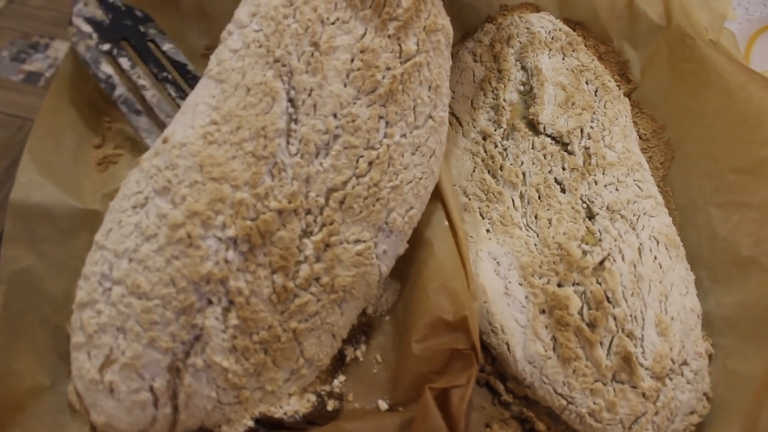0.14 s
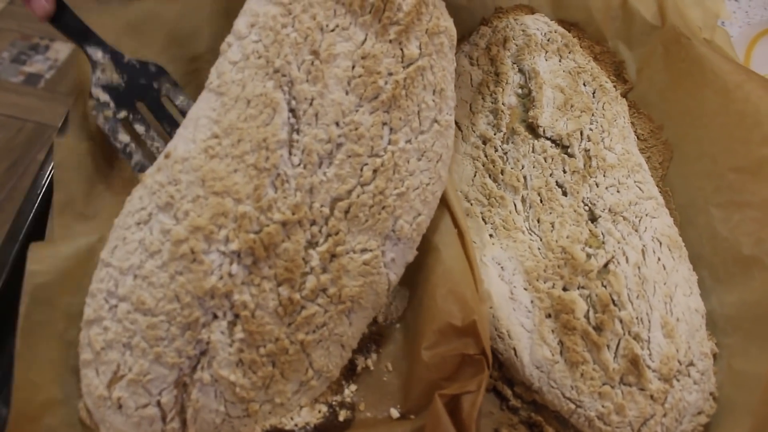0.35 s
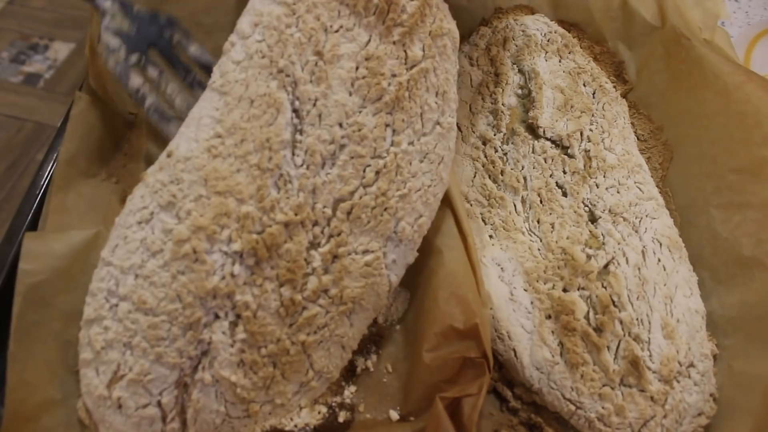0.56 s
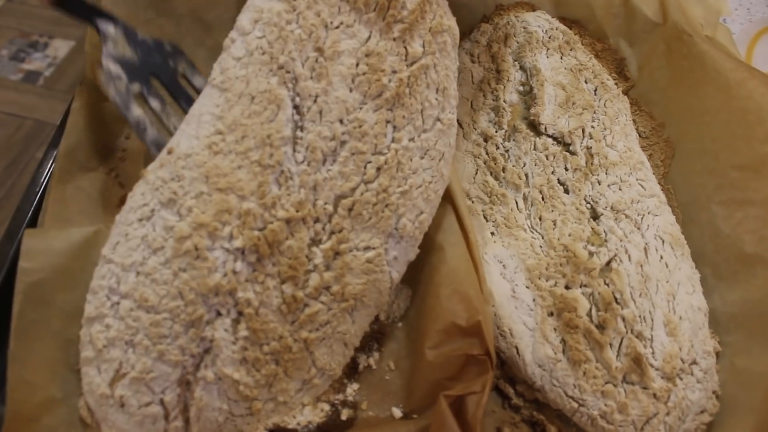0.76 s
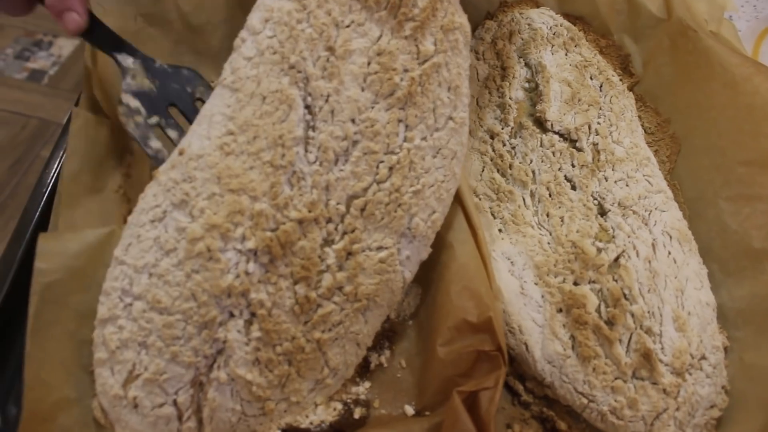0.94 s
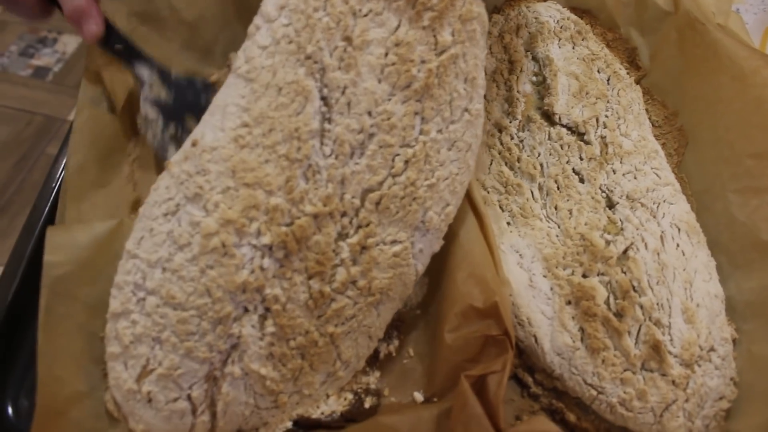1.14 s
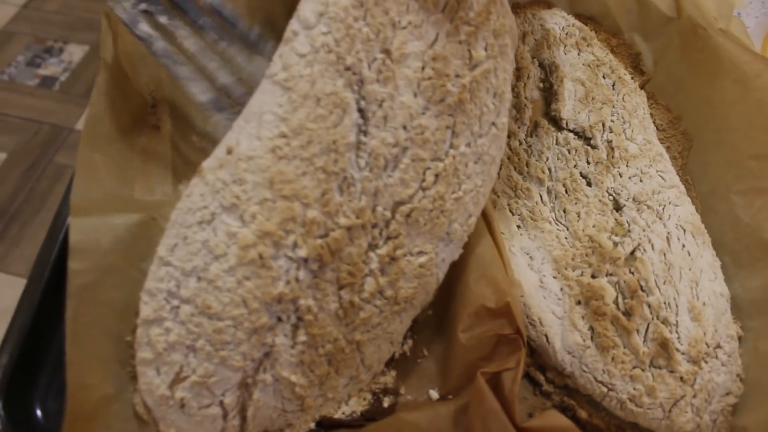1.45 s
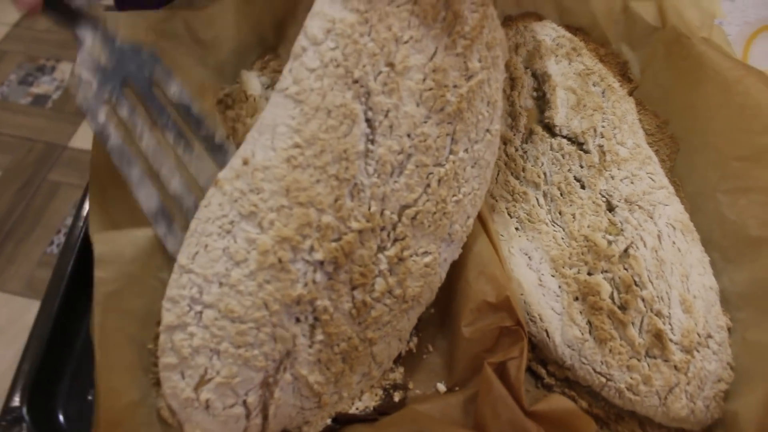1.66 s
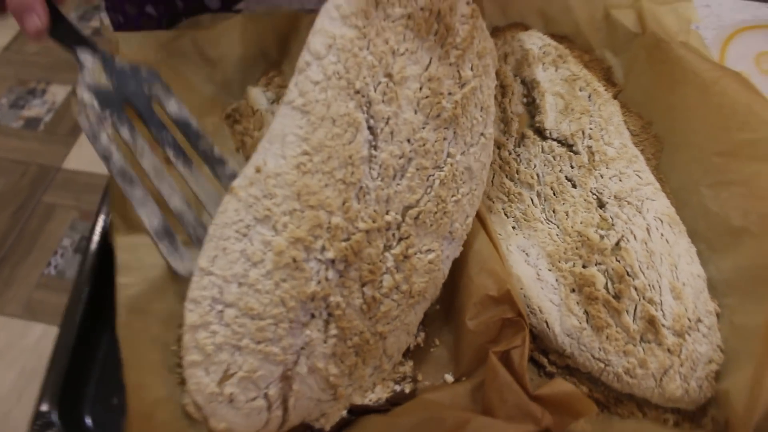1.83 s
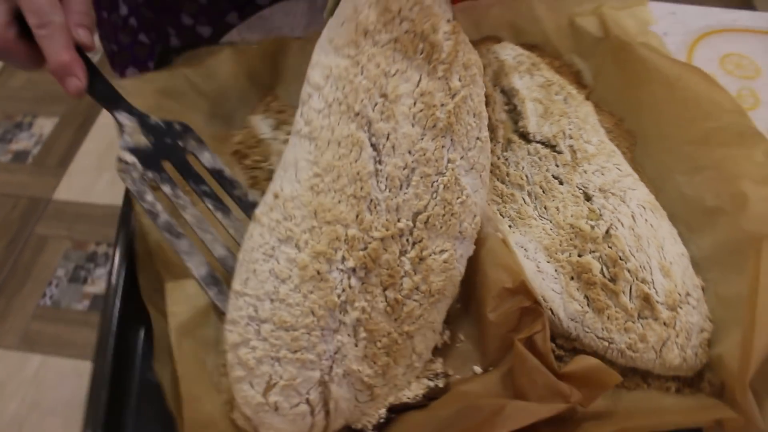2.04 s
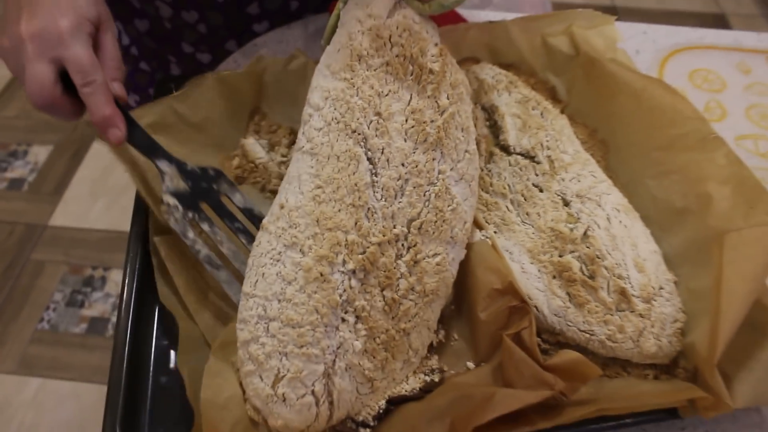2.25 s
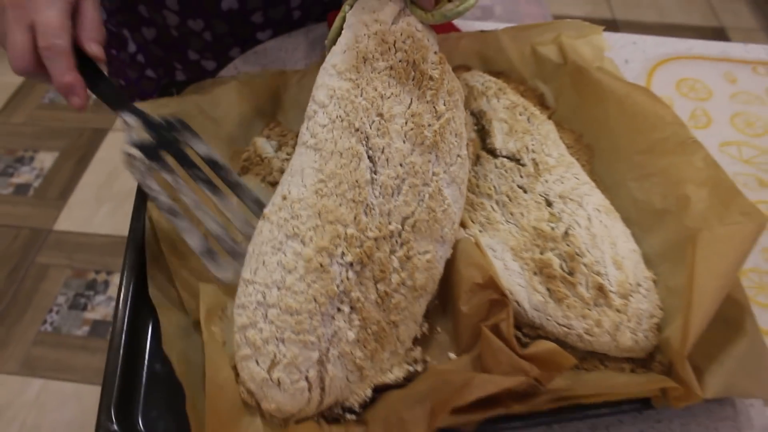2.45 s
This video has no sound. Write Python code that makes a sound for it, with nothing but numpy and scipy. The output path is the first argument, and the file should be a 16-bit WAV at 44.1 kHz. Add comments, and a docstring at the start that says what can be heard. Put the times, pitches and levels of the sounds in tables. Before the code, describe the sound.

Stiff baking parchment crinkles and snaps close to a phone microphone in a small kitchen, pausing briefly between bursts, while a spatula nudges a loaf and the tray thuds softly underneath.

```python
"""A small kitchen, heard close to a phone: a spatula works under a loaf on a tray and dry parchment crinkles.
Single creases snap with short noise bursts, stiff folds ring at a pitch, patches crunch and tiny creases
rustle as shaped noise. Loaf and tray thud softly and rub dully; the room adds a noisy tail.
Quiet room noise and a low rumble lie behind."""
import sys
import numpy as np
from scipy import signal
from scipy.fft import rfft, irfft
from scipy.io import wavfile
from scipy.ndimage import uniform_filter1d

SR = 44100
rng = np.random.default_rng(int(sys.argv[2]) if len(sys.argv) > 2 else 0)


def unload_audio(sound):
    """Save the sound as a 16-bit wav file, at the path given as the first command line argument."""
    columns = np.transpose(np.atleast_2d(sound))
    # keep every value between -1 and 1, then stretch to whole-number steps
    steps = np.round(np.clip(columns, -1, 1) * 32767)
    wavfile.write(sys.argv[1], SR, steps.astype(np.int16))


N = 114660  # length [samples]

# low, middle and high band of the sheet's sound:
# (from [Hz], to [Hz], multiplier of the fade time [-], rustle trim [dB])
BANDS = [(728, 2220, 1.27, -3.5), (2046, 5720, 0.83, -4), (5990, 14770, 0.92, -0.5)]
# faint rustle of the sheet before the band trim: (time [s], middle level [dB], high level [dB])
RUSTLE = [(0, -29.5, -39), (0.061, -41.5, -50.5), (0.1, -43, -63), (0.16, -39, -48.5), (0.28, -33.5, -52),
          (0.47, -28.5, -36.5), (0.66, -40, -53), (0.83, -48.5, -58), (0.97, -33, -42),
          (1.12, -29.5, -43.5), (1.25, -27.5, -33.5), (1.33, -30.5, -39), (1.39, -35.5, -45.5),
          (1.47, -40.5, -49.5), (1.6, -55, -60), (1.645, -42, -54), (1.71, -27, -34.5), (1.8, -26.5, -35),
          (1.92, -24.5, -31.5), (2.13, -27, -31), (2.22, -30.5, -38.5), (2.35, -32.5, -36),
          (2.47, -40, -50), (2.6, -38, -43.5)]
# stiff folds that flip, levels before the trims:
# (time [s], pitch [Hz], ring level [dB], middle band level [dB], high band level [dB])
TAPS = [(0.1094, 2700, -25, -17, -24), (0.1381, 1440, -20, -9.5, -10.5), (0.679, 2320, -28, -34, -38),
        (0.7035, 1780, -27, -30, -47), (1.6162, 1215, -18, -15.5, -30), (1.655, 1440, -17.5, -20, -27),
        (1.6836, 1860, -13.5, -10, -14), (2.4133, 1320, -15.5, -9.5, -7), (2.483, 1610, -13, -14, -8),
        (2.5453, 2490, -22.5, -23, -41), (2.578, 2440, -22.5, -20.5, -10)]


def undb(db):
    """Turn decibels into gain."""
    return 10 ** (np.asarray(db) / 20)


def unit(x):
    """Scale a sound to an rms level of 1."""
    return x / np.sqrt(np.mean(x ** 2))


def decay(t, t60):
    """Fall smoothly by 60 dB in t60 seconds."""
    return np.exp(-np.log(1000) * t / t60)


def curve(table, column):
    """Draw straight lines between the values in one column of a table that starts with time."""
    rows = np.array(table)
    return np.interp(np.arange(N) / SR, rows[:, 0], rows[:, column])


def colour(x, table):
    """Make pitches stronger or weaker by a table of (frequency [Hz], level [dB])."""
    hz, db = np.array(table, float).T
    f = np.maximum(np.arange(N // 2 + 1) * SR / N, 1)
    gain = undb(np.interp(np.log(f), np.log(hz), db))
    return irfft(rfft(x) * gain, N)


def band(x, lo_hz, hi_hz, order=3):
    """Keep only the sound between two frequencies."""
    return signal.sosfilt(signal.butter(order, [lo_hz, hi_hz], "band", fs=SR, output="sos"), x)


def fade(x, t60):
    """Let every impulse die away by 60 dB in t60 seconds."""
    return signal.lfilter([1], [1, -np.exp(-np.log(1000) / (t60 * SR))], x)


def impulses(times, sizes):
    """Place impulses of given sizes at given times in seconds."""
    return np.bincount(np.clip((times * SR).astype(int), 0, N - 1), sizes, N)


def walk(per_s):
    """Wander between random levels, per_s new ones a second with smooth steps; rms 1."""
    k = int(SR / per_s)
    steps = np.repeat(rng.standard_normal(4000), k)[:N]
    return unit(uniform_filter1d(steps, k // 2))


def snaps(table):
    """A crease buckles: a tick and a noise burst that lasts longest in the low band; the tray rings briefly."""
    # tray rings relative to the snap, before random changes: (pitch [Hz], level [dB], 60 dB fade time [s])
    tray = [(1265, -9.5, 0.031), (3360, -8.5, 0.011), (3647, -16.5, 0.03)]
    attack_s, level_db, tick_db = 0.00024, -6, 1.5
    ring_scatter_db, detune_share = 2, 0.051
    t = np.arange(4096) / SR
    shake, rings = np.zeros((3, N + 4096)), np.zeros(N + 4096)
    hz, ring_db, ring_t60 = np.array(tray).T[:, :, None]
    chance = rng.standard_normal((len(table), 2, len(tray), 1))
    for (s, low, mid, high, t60), (scatter, detune) in zip(table, chance):
        i = int(s * SR)
        for k, db in enumerate((low, mid, high)):
            fall = decay(t, t60 * BANDS[k][2])
            shake[k, i:i + 4096] += undb(db + level_db) * fall * (1 - np.exp(-t / attack_s))
        # low tray pitches follow the snap's low band, the others its middle band
        snap_db = np.where(hz < BANDS[0][1], low, mid)
        size = undb(snap_db + ring_db + ring_scatter_db * scatter)
        pitch = hz * (1 + detune_share * detune)
        ring = size * np.sin(2 * np.pi * pitch * t) * decay(t, ring_t60)
        rings[i:i + 4096] += ring.sum(axis=0)
    out, rows = rings[:N], np.array(table)
    for k, (lo, hi, _, _) in enumerate(BANDS):
        width = np.sqrt(SR / 2 / (hi - lo))  # makes up for the noise lost outside the band
        ticks = impulses(rows[:, 0] + attack_s, undb(rows[:, k + 1] + tick_db + level_db))
        burst = shake[k, :N] * rng.standard_normal(N)
        out = out + width * band(burst + width * ticks, lo, hi)
    return out


def taps():
    """A stiff fold flips and springs back and forth for a moment: a dying tone at its own pitch."""
    ring_t60_s = 0.025
    t, out = np.arange(4096) / SR, np.zeros(N + 4096)
    for s, hz, db, _, _ in TAPS:
        i = int(s * SR)
        out[i:i + 4096] += undb(db) * np.sin(2 * np.pi * hz * t) * decay(t, ring_t60_s)
    return out[:N]


def effort():
    """Gain of the rustle in each band: a faint bed, plus patches that crumple fast, hold and die away."""
    # crunches, where a patch of the sheet crumples all at once, before the band trim:
    # (time [s], length [s], low level [dB], middle level [dB], high level [dB])
    crunches = [(0.169, 0.0088, -31, -35, -35.5), (0.199, 0.061, -32.5, -35.5, -39),
                (0.285, 0.022, -37, -38, -40), (0.308, 0.039, -28, -23.5, -28.5),
                (0.351, 0.038, -22.5, -19.5, -22), (0.391, 0.049, -28.5, -18.5, -23.5),
                (0.409, 0.019, -16, -16.5, -23.5), (0.519, 0.068, -31, -24, -34.5),
                (0.561, 0.049, -32, -25.5, -34.5), (0.61, 0.034, -39, -36, -40),
                (0.84, 0.074, -25.5, -22.5, -30), (0.908, 0.031, -23, -20.5, -31),
                (1.016, 0.031, -20, -17.5, -24.5), (1.059, 0.027, -20, -15.5, -18.5),
                (1.257, 0.021, -28.5, -19.5, -28.5), (1.658, 0.038, -24, -24.5, -30),
                (1.718, 0.023, -22, -17, -21.5), (1.853, 0.011, -28, -37, -32),
                (1.88, 0.0098, -18.5, -20, -21.5), (1.939, 0.0075, -21.5, -21.5, -27),
                (1.998, 0.02, -26, -31, -37), (2.151, 0.037, -31, -16, -22),
                (2.163, 0.0079, -17.5, -14.5, -13.5), (2.234, 0.02, -29.5, -21.5, -28),
                (2.387, 0.047, -34, -26, -30)]
    attack_s, release_s, rustle_low_db = 0.0013, 0.011, -4.5  # release: time to fall to 37 %
    t = np.arange(N) / SR
    mid, high = curve(RUSTLE, 1), curve(RUSTLE, 2)
    power = undb(2 * np.array([mid + rustle_low_db, mid, high]))
    for s, length, *db in crunches:
        rise = np.clip((t - s) / attack_s, 0, 1)
        shape = rise * np.exp(-np.maximum(t - s - length, 0) / release_s)
        power = power + undb(2 * np.array(db))[:, None] * shape ** 2
    return np.sqrt(power)


def rustle(gain):
    """Tiny creases come in clusters and shake narrow patches of ever-changing colour; paper hisses steadily."""
    grains_per_s, grain_scatter_db, grain_colour_db = 1000, 3.8, 10.5
    grain_fade_s = 0.005  # time for a grain to fall 30 dB, before the band's multiplier
    cluster_db, clusters_per_s = 1.5, 160
    patch_db, patches_per_s = 3.0, 60
    slide_db = -5  # steady hiss against the crackle
    chance, out = rng.random((8000, 14)), 0
    times = np.cumsum(-np.log(chance[:, 0]) / grains_per_s)
    size_db = -grain_scatter_db * np.log(0.059 + chance[:, 1])  # many small grains, few big ones
    used = times < N / SR
    clusters = undb(cluster_db * walk(clusters_per_s))
    for k, (lo, hi, share, db) in enumerate(BANDS):
        edges = np.geomspace(lo, hi, num=5)
        width = np.sqrt(SR / 2 / (hi - lo))
        for j in range(4):
            colour_db = grain_colour_db * (chance[:, 2 + 4 * k + j] - 0.5)
            power = undb(2 * (size_db + colour_db))
            # powers add up where grains overlap
            grains = np.sqrt(fade(impulses(times[used], power[used]), grain_fade_s * share ** 2))
            crackle = unit(grains * clusters * undb(patch_db * walk(patches_per_s)))
            shake = (crackle + undb(slide_db)) * gain[k] * undb(db)
            patch = band(shake * rng.standard_normal(N), edges[j], edges[j + 1])
            out = out + width * patch
    return out


def thuds():
    """Loaf and tray knock dully: a damped tone mixed with noise around its pitch."""
    # soft thuds before the common trim: (time [s], level [dB], pitch [Hz])
    knocks = [(0.031, -30, 143), (0.034, -36, 770), (0.409, -25.5, 165), (0.752, -40, 390),
              (0.854, -31.5, 147), (1.016, -26.5, 405), (1.716, -27.5, 410), (1.862, -32.5, 456)]
    t60_s, trim_db = 0.058, 3.5
    out, t = np.zeros(N + 8192), np.arange(8192) / SR
    shape = decay(t, t60_s) * (1 - np.exp(-t / t60_s * 20))
    for s, db, hz in knocks:
        noise = band(rng.standard_normal(8192), hz * 0.64, hz * 2.13)
        ring = np.sin(2 * np.pi * hz * t) + 6.0 * noise
        i = int(s * SR)
        out[i:i + 8192] += undb(db + trim_db) * ring * shape
    return out[:N]


def body(gain):
    """The loaf rubs dully on the tray: low noise that follows the faint rustle and the low crunches."""
    body_db = -17.5  # against the rustle
    rub = undb(curve(RUSTLE, 1)) + 0.83 * gain[0]
    return undb(body_db) * rub * unit(band(rng.standard_normal(N), 281, 1140))


def room(x):
    """A small kitchen throws the sound back as a diffuse, dull tail of fading noise."""
    t60_s, level_db, top_hz = 0.33, -18.5, 5700
    t = np.arange(SR // 2) / SR
    tail = band(rng.standard_normal(len(t)), 340, top_hz) * decay(t, t60_s)
    return undb(level_db) * signal.fftconvolve(x, tail / np.sqrt(np.sum(tail ** 2)))[:N]


def kitchen():
    """Quiet room noise and a low rumble, both shaped noise, swell and sink together."""
    # colour of the room noise: (frequency [Hz], relative level per Hz [dB])
    noise_colour = [(50, -36), (100, -6.5), (140, -1.5), (223, -9), (403, -12.5), (700, -10), (5370, -46),
                    (16000, -60)]
    # low rumble: (time [s], level [dB])
    rumble_level = [(0, -42.5), (.45, -55), (.9, -42.5), (1.15, -49), (1.55, -42), (1.75, -35.5),
                    (2.05, -51.5), (2.22, -55), (2.35, -47), (2.6, -50.5)]
    noise_db, swell_share, rumble_top_hz = -52, 0.2, 62
    rumble = unit(band(rng.standard_normal(N), 18, rumble_top_hz, order=4))
    noise = unit(colour(rng.standard_normal(N), noise_colour))
    db = curve(rumble_level, 1)
    swell_db = swell_share * (db - db.mean())  # the noise moves less than the rumble
    return undb(noise_db + swell_db) * noise + undb(db) * rumble


def scene():
    """Sheet, loaf and tray sound in the kitchen."""
    # creases that snap, before the level trim and the bands' fade multipliers:
    # (time [s], low level [dB], middle level [dB], high level [dB], 60 dB fade time [s])
    creases = [(0.143, -34, -13.5, -20, 0.025), (0.3085, -37, -16, -15, 0.028),
               (0.3245, -18.5, -9, -8, 0.015), (0.338, -7.5, -4, -21, 0.018), (0.3727, -7.5, 1, -7, 0.015),
               (0.3839, -11, 3.5, 3.5, 0.0073), (0.4325, -15, -10, -11, 0.013),
               (0.476, -44, -18, -17.5, 0.028), (0.536, -26, -10, -23, 0.015),
               (0.5439, -20, -1.5, -25, 0.02), (0.5632, -24, -16, -12, 0.023),
               (0.5992, -22.5, -10.5, -13, 0.033), (0.6547, -49, -13.5, -41, 0.005),
               (0.7742, -33.5, -28, -35, 0.04), (0.8416, -36, -2, -9, 0.0068), (0.8488, -41, -2, 1, 0.0098),
               (0.857, -19, -5.5, -12, 0.034), (0.8697, -1, -2.5, -4.5, 0.011),
               (0.924, -11, -11, -18, 0.022), (0.937, -13.5, -4.5, -8, 0.066), (1.0007, -46, -6, -7, 0.015),
               (1.0214, -12, -5, -15, 0.0078), (1.0323, -10.5, -2.5, -20, 0.043),
               (1.1445, -24, -33, -13.5, 0.022), (1.2285, -39.5, -3.5, -28, 0.0052),
               (1.2698, -15, -13, -21, 0.027), (1.3068, -22, -9, -12, 0.05),
               (1.3389, -17.5, -15, -27, 0.04), (1.4143, -23, -12.5, -14.5, 0.012),
               (1.434, -18.5, -16, -20.5, 0.028), (1.7183, -7.5, -0.5, 0, 0.014),
               (1.7755, -16, -5.5, -33, 0.016), (1.866, -12, -9.5, -19, 0.017),
               (1.8773, -4.5, -1, 7, 0.011), (1.905, -15, -5.5, -18, 0.012), (1.9206, -17, -14, -12, 0.058),
               (1.9497, -15, -4, -10, 0.015), (1.9716, -20, 0, -3.5, 0.023), (1.9809, -8, 2, 3, 0.0065),
               (2.0202, -13, -9, -5.5, 0.033), (2.0341, -20, -4.5, 7, 0.0073),
               (2.0491, -4.5, -2.5, 1.5, 0.019), (2.0729, -14.5, -10.5, -13, 0.039),
               (2.1004, -26, -14, -20, 0.045), (2.1147, -17, -13, -4, 0.013), (2.1446, -13.5, -11, 2, 0.02),
               (2.1524, -28, -30, 0.5, 0.013), (2.2724, -13, -12.5, -4.5, 0.031),
               (2.2865, -11, -11, -11, 0.028), (2.3115, -22, -12, -11, 0.011),
               (2.398, -26, -16, -11, 0.015), (2.448, -30, -18.5, -34, 0.17),
               (2.4604, -23, -32, -15, 0.024), (2.4934, -28, -23, -3, 0.0084)]
    # colour of the sheet's sound: (frequency [Hz], level [dB])
    sheet_colour = [(400, -2), (800, -8.5), (1250, -2.5), (2200, -3.5), (3500, 2.5), (5000, -4.5),
                    (6500, -1), (11000, -4.5), (15000, -11.5), (16500, -20)]
    tap_t60_s, tap_low_db = 0.025, -1
    gain = effort()
    # a flipping fold also snaps; its low band follows the ring level
    folds = [(s, db + tap_low_db, mid, high, tap_t60_s) for s, _, db, mid, high in TAPS]
    sheet = snaps(creases + folds) + taps() + rustle(gain)
    near = colour(sheet, sheet_colour) + thuds() + body(gain)
    return (near + room(near) + kitchen())[None]


def record(dry):
    """The phone clips the highest peaks, then a steep filter cuts the top."""
    top_hz = 16300
    top = signal.ellip(12, 0.2, 90, top_hz, fs=SR, output="sos")
    return signal.sosfilt(top, np.clip(dry, -1, 1))


dry = scene()
out = record(dry)
unload_audio(out)
```